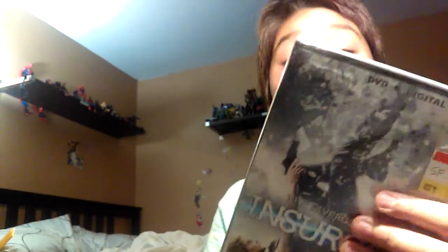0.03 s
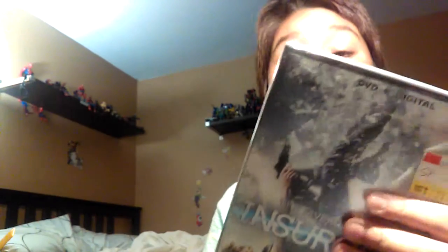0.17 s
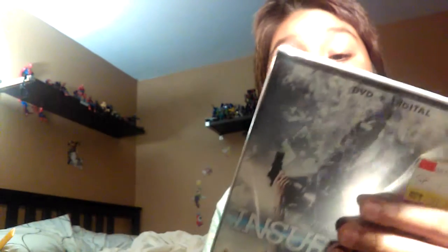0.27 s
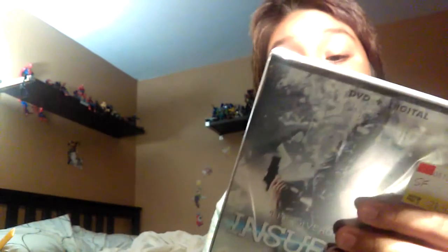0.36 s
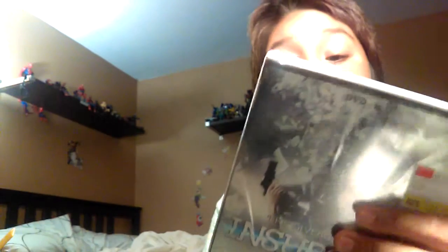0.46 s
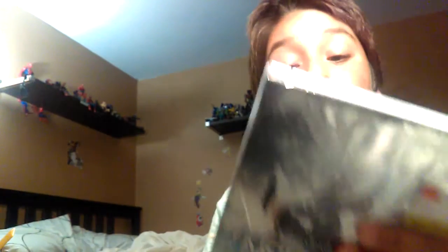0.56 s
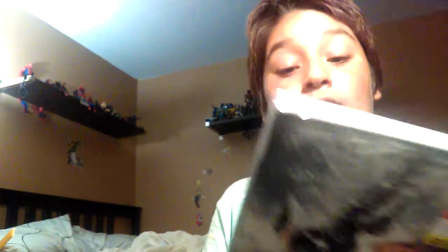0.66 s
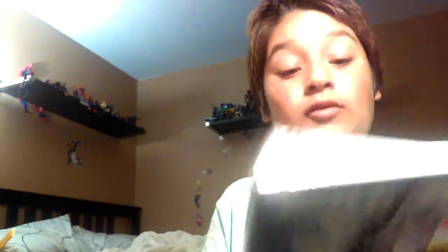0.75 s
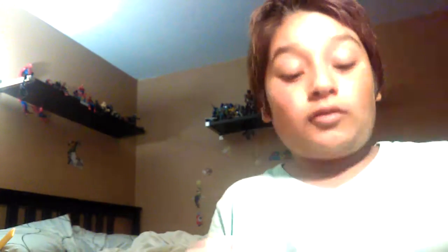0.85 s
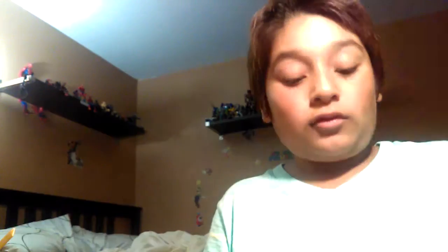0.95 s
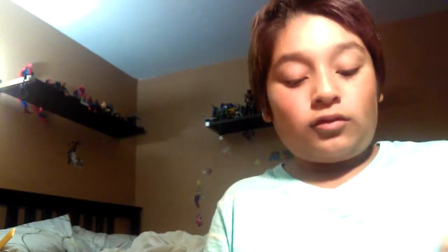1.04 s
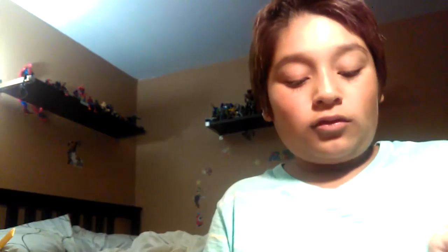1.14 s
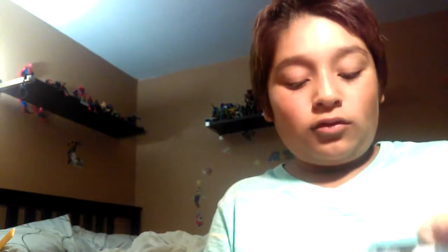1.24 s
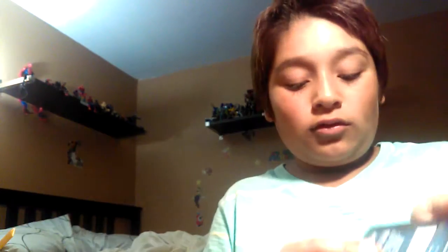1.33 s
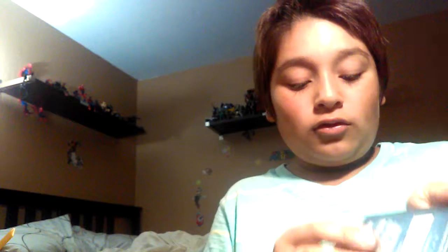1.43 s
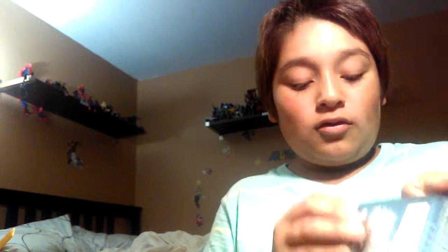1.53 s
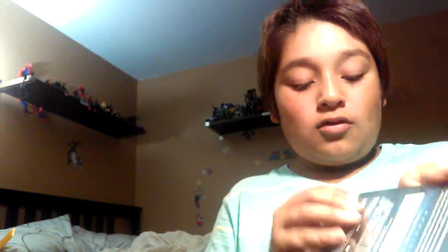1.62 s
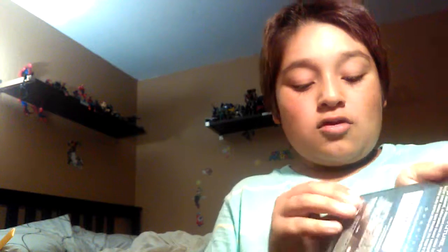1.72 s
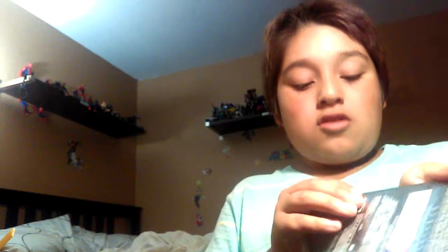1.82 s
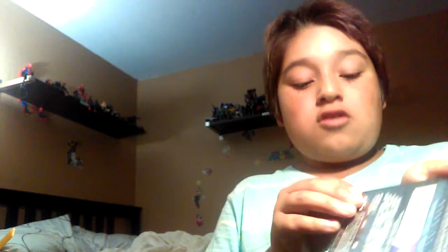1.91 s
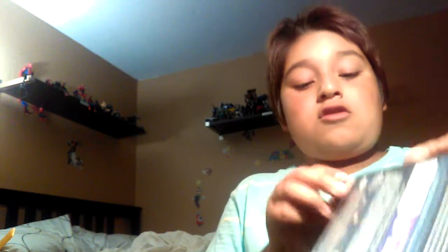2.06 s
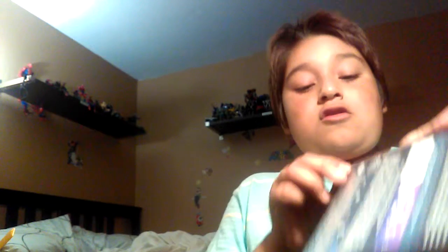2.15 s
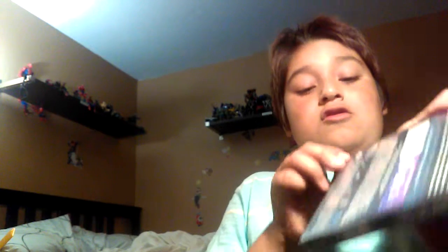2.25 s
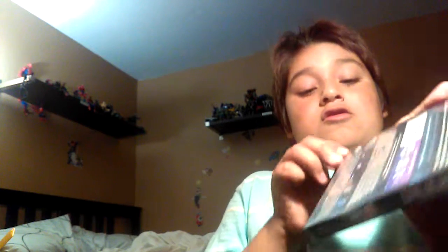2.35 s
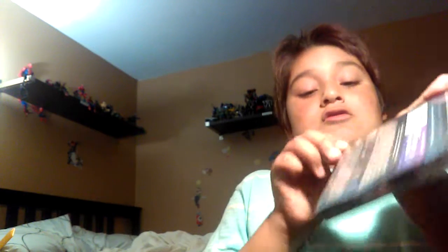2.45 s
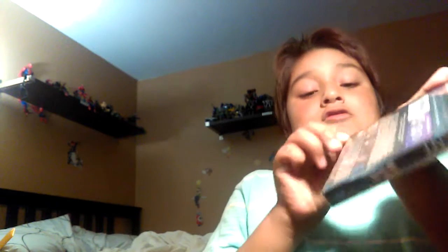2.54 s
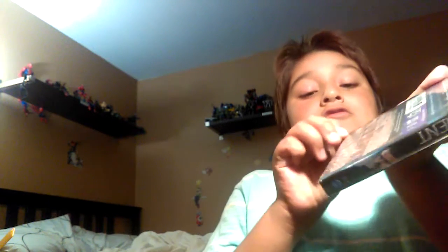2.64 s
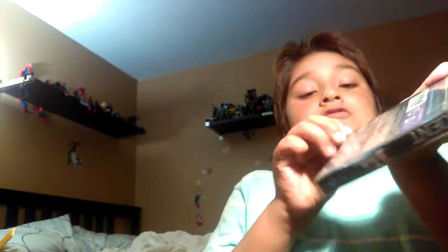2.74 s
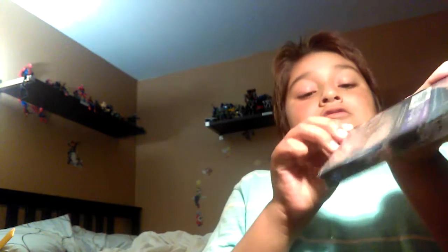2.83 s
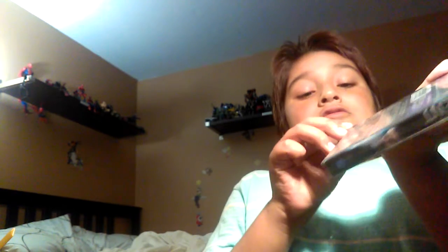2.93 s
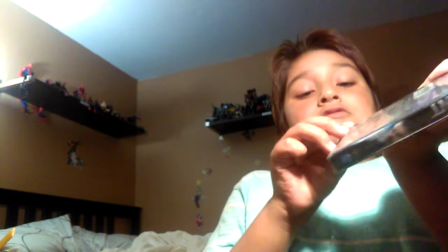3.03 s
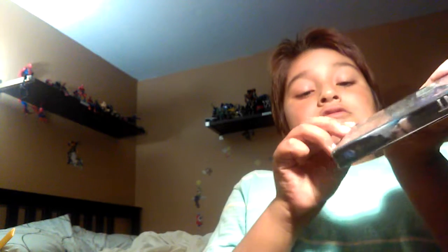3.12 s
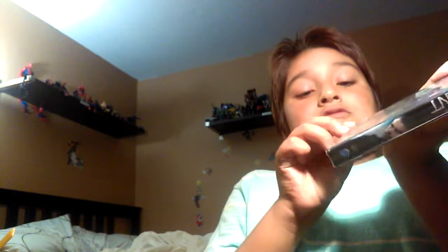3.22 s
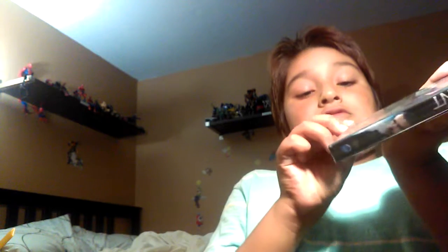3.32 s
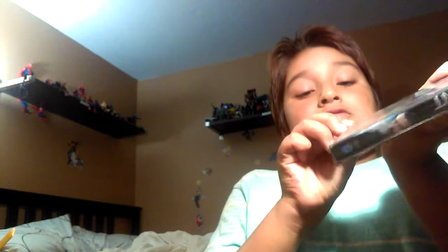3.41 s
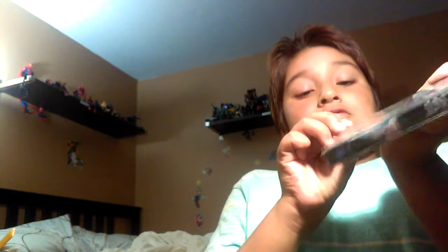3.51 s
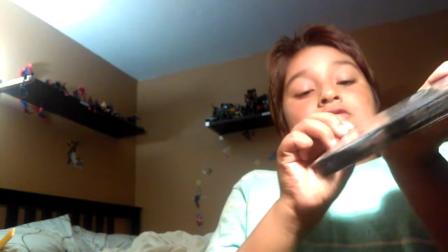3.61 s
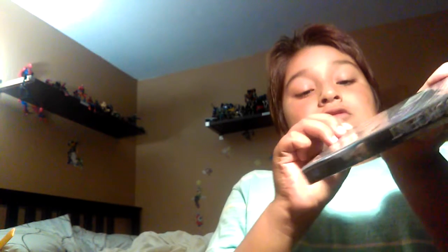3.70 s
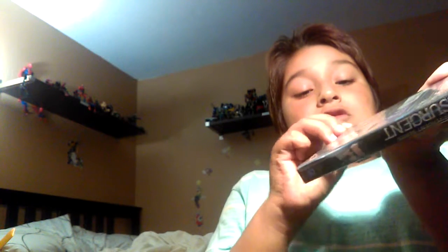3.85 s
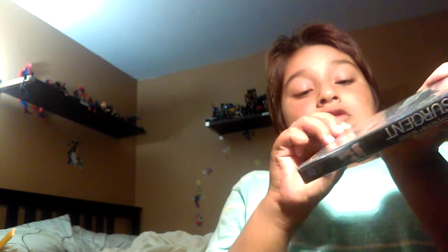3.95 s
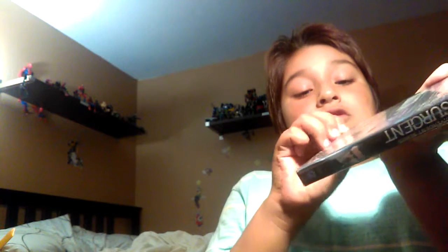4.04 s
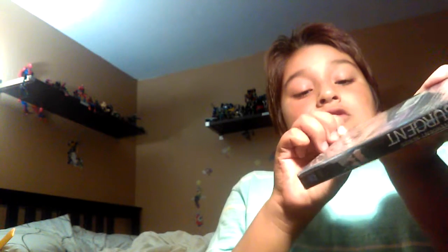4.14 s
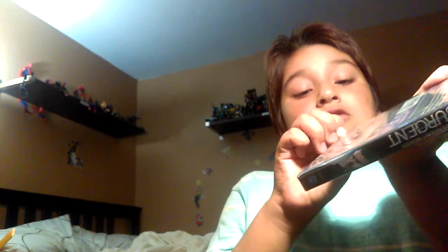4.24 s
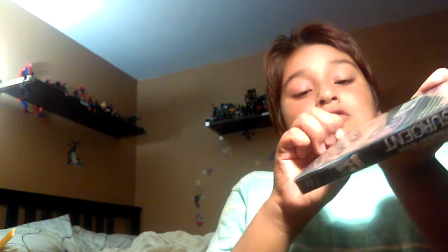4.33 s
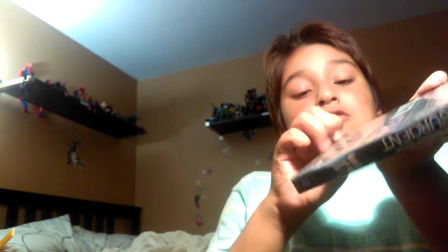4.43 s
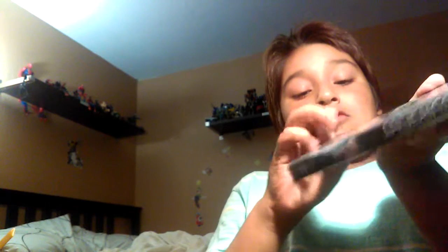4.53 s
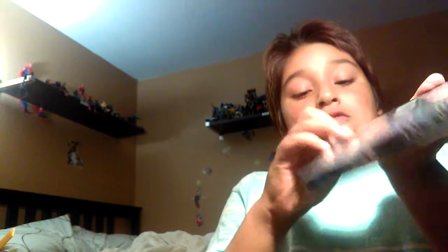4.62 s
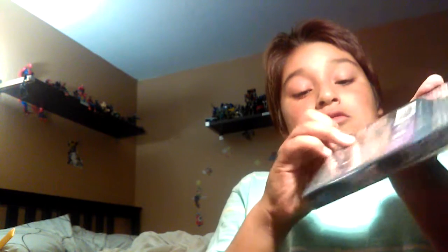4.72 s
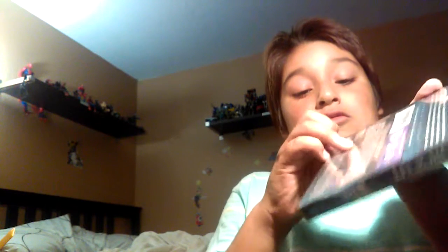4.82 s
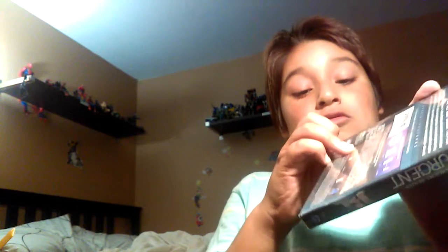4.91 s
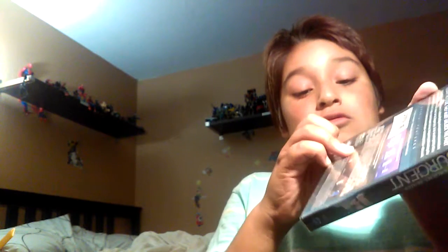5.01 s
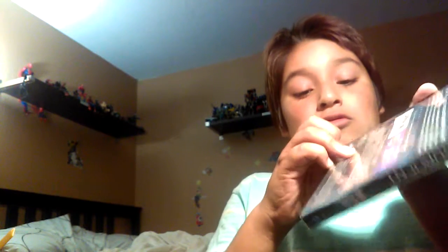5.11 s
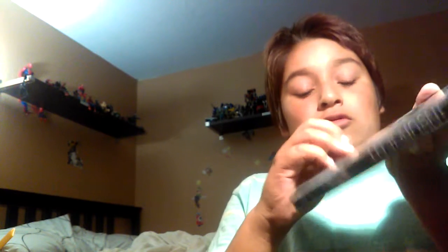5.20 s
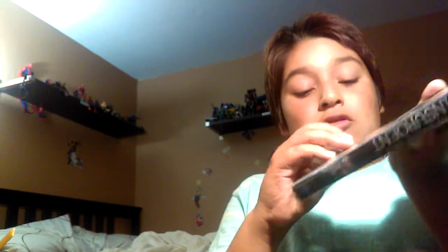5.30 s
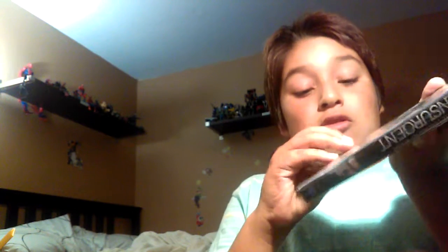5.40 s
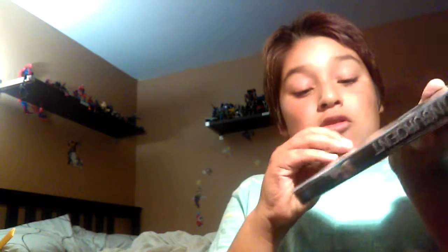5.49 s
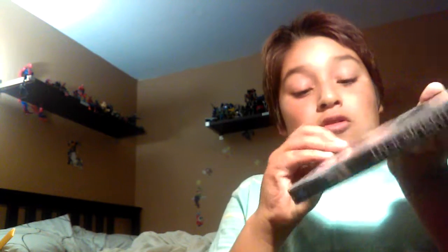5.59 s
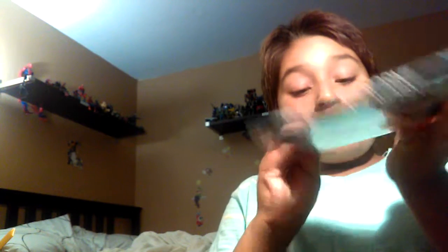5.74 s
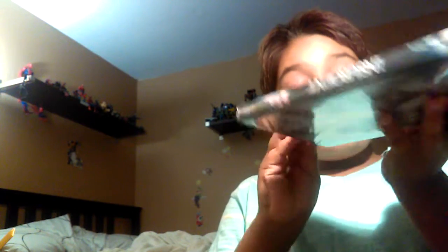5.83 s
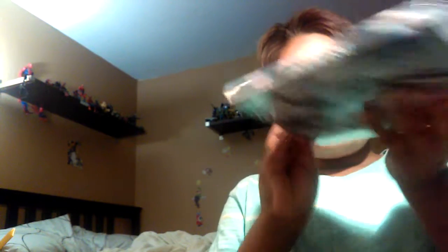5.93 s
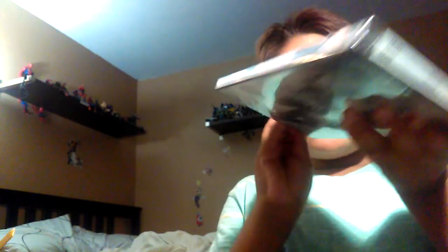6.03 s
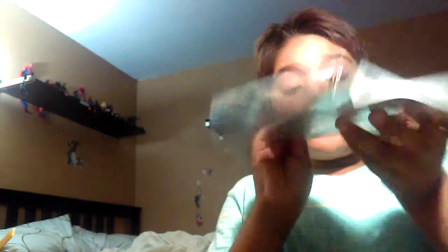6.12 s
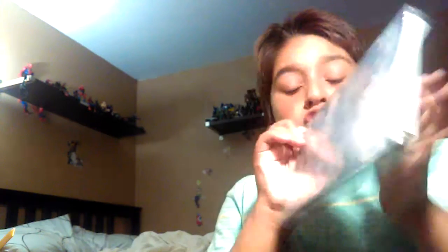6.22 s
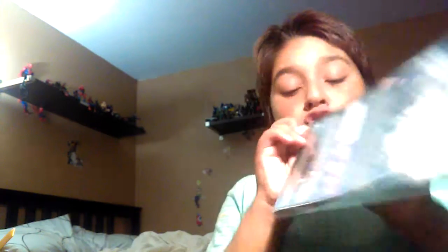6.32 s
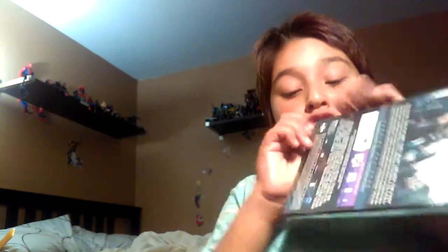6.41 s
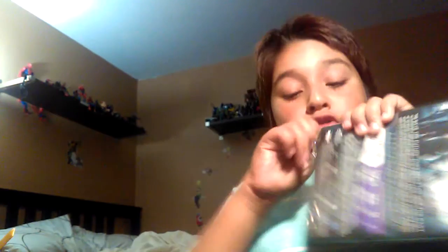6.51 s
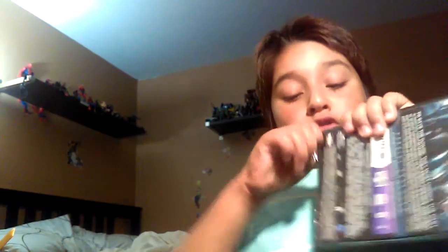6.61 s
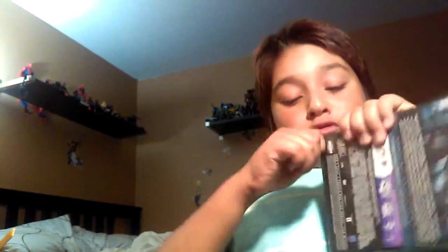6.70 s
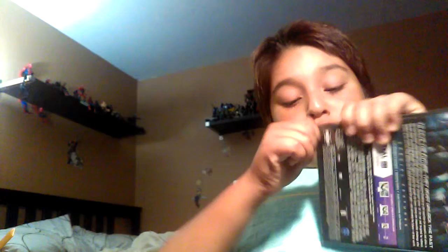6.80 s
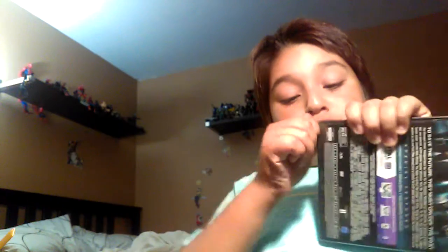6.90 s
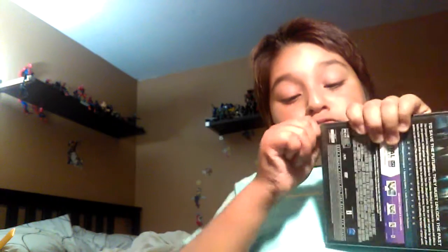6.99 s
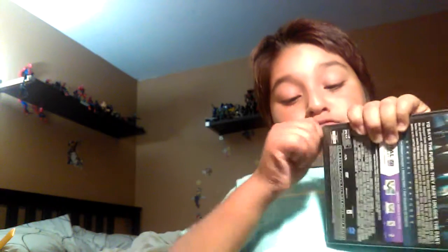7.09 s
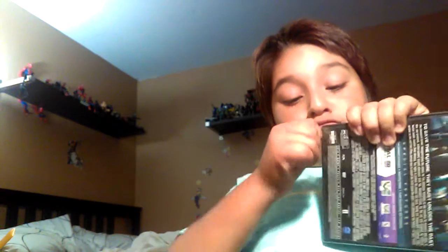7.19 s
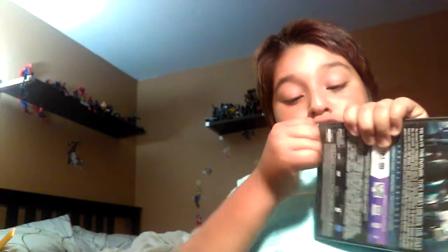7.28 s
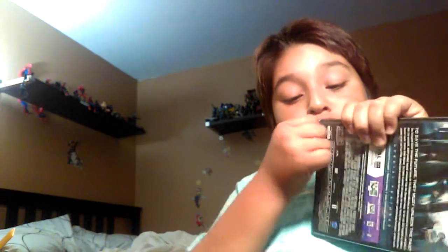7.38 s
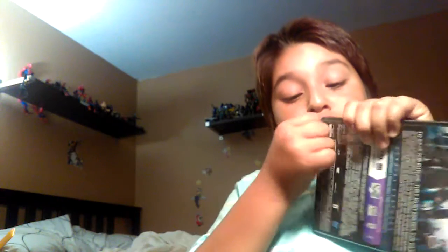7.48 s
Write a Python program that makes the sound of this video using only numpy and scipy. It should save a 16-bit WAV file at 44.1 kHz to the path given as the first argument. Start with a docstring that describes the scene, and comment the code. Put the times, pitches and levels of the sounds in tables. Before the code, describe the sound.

Fingers pick at plastic film on a hollow disc case; sparse crackles and knocks grow into sharp snaps and tearing in a quiet bedroom.

```python
"""A quiet bedroom: fingers pick at the plastic film on a thin disc case, close to a pair of small microphones.
The film snaps, tears and crackles in the treble, made of short noise bursts and bands of gated noise.
Knocks, creaks, plucks and rubbing ring the hollow case, a bank of decaying modes; once it slides over cloth
while the film hisses. The room adds a short noise tail, over a low rumble of handling and background noise."""
import sys
import numpy as np
from scipy import signal
from scipy.fft import rfft, irfft, next_fast_len
from scipy.io import wavfile

SR = 44100
rng = np.random.default_rng(int(sys.argv[2]) if len(sys.argv) > 2 else 0)


def to_wav(sig):
    """Store sig (one row per channel, or 1-D mono) as 16-bit WAV at the path in sys.argv[1].

    Samples outside -1..1 are clipped; the rate is SR.
    """
    pcm = np.clip(np.atleast_2d(sig), -1, 1) * 32767
    pcm = np.round(pcm).astype(np.int16)
    wavfile.write(sys.argv[1], SR, pcm.T)  # frames by channels


N = 332955


def undb(db):
    """Turn dB into gain."""
    return 10 ** (np.asarray(db) / 20)


def unit(x):
    """Scale a sound to an RMS of 1."""
    return x / np.sqrt(np.mean(x ** 2))


def colour(x, points):
    """Shape a spectrum by (frequency [Hz], gain [dB]) points, joined along log frequency."""
    hz, db = np.transpose(points)
    size = next_fast_len(x.shape[-1])
    f = np.maximum(np.arange(size // 2 + 1) * SR / size, 1)
    gain = undb(np.interp(np.log(f), np.log(hz), db))
    return irfft(rfft(x, size) * gain, size)[..., :x.shape[-1]]


def sides(pan_db):
    """Left and right gains, as a column, from left minus right in dB."""
    return undb(np.array([pan_db, -pan_db]) / 2)[:, None]


def fall(x, t60):
    """Every impulse leaves an exponential tail that drops 60 dB in t60 seconds."""
    return signal.lfilter([1], [1, -np.exp(-np.log(1000) / (t60 * SR))], x)


def mode_pole(hz, t60):
    """Complex pole of a mode that swings at hz and drops 60 dB in t60 seconds."""
    return np.exp(2j * np.pi * hz / SR - np.log(1000) / (t60 * SR))


def clicks(per_s, scatter_db, size=N):
    """Impulses at random times; many small, a few large, at most 14 dB over the smallest."""
    when, strength = rng.random(size), rng.exponential(size=size)
    return (when < per_s / SR) * undb(np.minimum(scatter_db * strength, 14))


def add(out, s, sound):
    """Mix a stereo sound in at s seconds."""
    i = int(s * SR)
    out[:, i:i + sound.shape[1]] += sound[:, :N - i]


def burst(hz, width, t60, tail_db, tail_t60):
    """A crack of noise, partly alike at the two ports, then smaller creases as the film settles."""
    t = np.arange(int(.12 * SR)) / SR
    crease_hits = (rng.random(len(t)) < 220 / SR) * rng.random(len(t))
    creases = fall(crease_hits, t60) + 0.06
    edges = np.clip([hz / width, hz * width], 1000, .32 * SR)
    band = signal.butter(2, edges, "band", fs=SR, output="sos")
    noise = rng.standard_normal((2, len(t))) + 1.7 * rng.standard_normal(len(t))  # own + shared
    noise = unit(signal.sosfilt(band, noise)) / np.sqrt(2)
    attack = np.minimum(t / 0.00017, 1)
    crack = attack * 1000 ** (-t / t60) * noise
    # the face of the case returns the crack a moment later
    crack = crack + .45 * np.roll(crack, int(rng.uniform(.0003, .0005) * SR), axis=1)
    return crack + undb(tail_db) * creases * 1000 ** (-t / tail_t60) * noise


def run(start, end, spacing, jitter):
    """Times of a stick-slip row of at most 24 slips, and two chance values for each."""
    chance = rng.standard_normal((24, 3))
    s = start + spacing * (np.arange(24) + jitter * chance[:, 0])
    return s[s < end], chance[s < end, 1:].T


# single snaps of the film: (time [s], level [dB], centre [Hz])
FILM_SNAPS = [(0.341, -38, 8500), (0.469, -38, 10400), (0.5284, -30, 8900), (0.5509, -32, 9400),
              (0.6642, -36, 9200), (0.719, -28.5, 7860), (1.48, -45, 9920), (1.586, -37, 11700),
              (1.9378, -36.5, 7800), (2.4778, -32.5, 11200), (2.6436, -31, 11400), (3.1631, -35.5, 9100),
              (3.3015, -32.5, 10000), (3.474, -37, 11200), (3.497, -28.5, 12000), (3.5784, -30.5, 10800),
              (3.776, -32.5, 11400), (3.8925, -40.5, 7100), (4.027, -49.5, 11500), (4.147, -35.5, 11200),
              (4.289, -43.5, 10630), (4.315, -52, 9500), (4.33, -44, 10000), (4.3595, -39, 11000),
              (4.408, -37.5, 11700), (4.4784, -28.5, 11700), (4.559, -31.5, 9800), (4.578, -37, 10500),
              (4.6365, -35.5, 11100), (4.663, -24.5, 12000), (4.6682, -17, 10300), (4.714, -28.5, 10700),
              (4.716, -25, 11000), (4.832, -27, 11300), (4.846, -24.5, 12200), (4.896, -31, 11100),
              (5.067, -37, 12900), (5.2037, -31, 11600), (5.2455, -35, 11800), (5.3475, -41, 8600),
              (5.4483, -39, 12400), (5.63, -26.5, 9340), (5.655, -35, 8600), (5.749, -29.5, 12000),
              (5.837, -33, 12600), (5.89, -19, 8800), (5.96, -20.5, 8700), (6.0783, -38, 9500),
              (6.147, -37, 9500), (6.1578, -30, 10600), (6.174, -28, 9900), (6.195, -25, 11600),
              (6.1985, -33, 11600), (6.2074, -18.5, 10700), (6.226, -21, 11900), (6.2323, -21.5, 13600),
              (6.247, -31, 8250), (6.2637, -22, 8500), (6.28, -23.5, 12000), (6.505, -40, 11100),
              (6.542, -26.5, 9300), (6.7839, -28.5, 10500), (7.039, -31.5, 10000), (7.256, -39, 10200)]
# the film gives way in a row of snaps: (start [s], end [s], spacing [s], level [dB], centre [Hz])
FILM_TEARS = [(4.908, 5.041, 0.011, -47, 12000), (6.675, 6.78, 0.031, -38, 9400)]
TEAR_JITTER = .3  # share of the spacing


def snaps():
    """All snaps (s, dB, Hz): single ones, and tears as uneven rows scattered in level and pitch."""
    rows = [np.array(FILM_SNAPS)]
    for start, end, spacing, db, hz in FILM_TEARS:
        s, chance = run(start, end, spacing, TEAR_JITTER)
        rows.append(np.transpose([s, db + 2.3 * chance[0], hz * np.exp(0.041 * chance[1])]))
    return np.vstack(rows)


# the film is crumpled in short spells: (start [s], hold [s], crackle level [dB])
CRUMPLE_SPELLS = [(1.022, 0.0097, -76), (1.568, 0.18, -63.5), (4.492, 0.017, -60), (4.687, 0.043, -64),
                  (5.204, 0.0051, -48), (6.197, 0.073, -45), (6.47, 0.09, -45), (6.644, 0.069, -49.5)]
CRUMPLE_RISE_DB_S, CRUMPLE_FALL_DB_S = 510.5, 251


def crumpling(t):
    """Crackle gain of the crumpled spells: quick rise, hold, slower fall."""
    gain = np.zeros(len(t))
    for s, hold, db in CRUMPLE_SPELLS:
        rise = CRUMPLE_RISE_DB_S * np.maximum(s - t, 0)
        drop = CRUMPLE_FALL_DB_S * np.maximum(t - s - hold, 0)
        gain += undb(db - rise - drop)
    return gain


# tone of the film's crackle: (frequency [Hz], relative level per Hz [dB])
CRACKLE_TONE = [(1180, -48), (2370, -14.5), (3550, 4), (4790, 1.5), (7520, 11.5), (12400, 12.5),
                (14500, -4), (16500, -19.5)]
# stereo place of the crackle: (frequency [Hz], left minus right [dB])
CRACKLE_PAN = [(4400, -16.5), (8100, -6), (15000, 10)]
SNAP_T60_S = .008
SNAP_PAN_DB_PER_OCTAVE, SNAP_CENTRE_HZ = 6, 9700  # brighter snaps lie further left


def film(crackle, creases, snap):
    """Snaps as noise bursts, and under them fine crackle whose creases each have their own colour."""
    out = np.zeros((2, N))
    for s, db, hz in snap:
        pan_db = SNAP_PAN_DB_PER_OCTAVE * np.log2(hz / SNAP_CENTRE_HZ)
        add(out, s, undb(db) * sides(pan_db) * burst(hz, 1.366, SNAP_T60_S, -10.5, 0.16))
    hz, db = np.transpose(CRACKLE_TONE)
    pan_hz, pan_points_db = np.transpose(CRACKLE_PAN)
    bands = []
    for centre in np.geomspace(2500, 14000, num=5):
        window = np.transpose([hz, db - 30 * np.log(hz / centre) ** 2])
        # each crease is strong in some bands and weak in others
        gate = fall(creases * undb(3.4 * rng.standard_normal(N)), 0.007) + .07
        pan_db = np.interp(np.log(centre), np.log(pan_hz), pan_points_db)
        bands.append(gate * colour(rng.standard_normal((2, N)), window) * sides(pan_db))
    return out + crackle * unit(np.array(bands)).sum(axis=0) / np.sqrt(len(bands))


# the lid creaks under the grip: (time [s], level [dB])
LID_CREAKS = [(0.342, -41.5), (0.353, -42), (0.385, -42), (0.403, -33), (0.426, -35.5), (0.456, -48),
              (0.471, -34), (0.494, -35.5), (0.53, -44), (0.557, -33.5), (0.637, -32), (0.692, -30),
              (0.767, -31.5), (0.96, -37.5), (0.981, -36), (1.593, -37.5), (1.704, -39), (2.262, -38.5),
              (2.358, -44), (2.479, -39.5), (2.554, -42), (3.276, -40.5), (3.57, -35.5), (4.482, -53),
              (4.493, -37), (4.831, -47), (4.876, -40.5), (3.687, -35.5), (5.449, -43), (5.654, -38.5),
              (5.872, -22.5), (6.168, -39), (6.209, -31.5), (6.264, -31), (6.351, -29.5), (6.449, -40),
              (6.461, -17.5), (6.484, -29), (6.488, -23.5), (6.528, -31), (6.571, -20), (6.629, -25.5),
              (6.89, -40), (7.062, -37), (7.476, -31), (7.516, -40)]
# runs of quick creaks: (start [s], end [s], spacing [s], level [dB])
QUICK_CREAKS = [(3.351, 3.47, 0.015, -43), (5.695, 5.801, 0.0075, -45)]
# a nail plucks the taut edge of the film: (time [s], level [dB])
NAIL_PLUCKS = [(4.6254, -44.5), (4.7137, -35.5), (5.2036, -32), (5.2465, -34), (5.3467, -40.5),
               (5.6291, -34), (6.1459, -33), (6.1814, -41), (6.2253, -29.5), (6.2472, -27), (6.2791, -25),
               (6.5425, -17.5), (6.6712, -35), (6.7082, -38), (6.7276, -36), (6.7324, -32), (6.7595, -35),
               (6.7845, -29)]
CREAK_HZ, PLUCK_HZ, TICK_SPREAD = 1230, 2820, .08  # centres; each tick lies a little off (log spread)
CREAK_JITTER, CREAK_SCATTER_DB = 0.08, 2  # in runs; jitter is a share of the spacing


def ticks():
    """All creaks and plucks (s, dB, Hz): short pushes, each with its own centre in the case's modes."""
    rows = [np.insert(LID_CREAKS, 2, CREAK_HZ, axis=1), np.insert(NAIL_PLUCKS, 2, PLUCK_HZ, axis=1)]
    for start, end, spacing, db in QUICK_CREAKS:
        s, chance = run(start, end, spacing, CREAK_JITTER)
        rows.append(np.transpose([s, db + CREAK_SCATTER_DB * chance[0], np.full(len(s), CREAK_HZ)]))
    s, db, hz = np.vstack(rows).T
    return np.transpose([s, db, hz * np.exp(TICK_SPREAD * rng.standard_normal(len(s)))])


# fingers moving over case and film: (time [s], rubbing level [dB], crackle level [dB])
FINGER_MOVES = [(0, -56, -56.5), (.3, -64, -70.5), (.65, -51, -59), (.95, -64.5, -59), (1.2, -44.5, -63),
                (1.5, -54.5, -63.5), (1.781, -63.5, -73.5), (2.269, -66, -78), (2.651, -61.5, -68.5),
                (3.049, -72, -74), (3.45, -64, -64.5), (4.149, -72, -75.5), (4.549, -65.5, -75),
                (5.75, -65, -63.5), (6.2, -57, -64.5), (6.42, -54.5, -99), (6.58, -43, -74),
                (6.85, -61.5, -59.5), (7.2, -64.5, -66.5), (7.55, -64.5, -56.5)]


def fingers(t):
    """Rubbing and crackle levels in dB, gliding from point to point as the fingers move."""
    s, rub_db, crackle_db = np.transpose(FINGER_MOVES)
    return np.interp(t, s, rub_db), np.interp(t, s, crackle_db)


# knocks and picks on the case: (time [s], level [dB], upper modes over that [dB],
# low modes over that [dB], odd modes over even [dB])
CASE_KNOCKS = [(0.032, -44, 9, 5.5, -5.5), (0.255, -43, 3.5, 10, 3), (0.653, -46, 9, 10.5, -6),
               (0.8334, -12.5, 2, 0, 11), (0.857, -47, -16, -6, -5), (1.014, -48.5, 3, 3.5, -22),
               (1.037, -41.5, 4, -15, 13), (1.0435, -37, 5.5, -9, -4), (1.1086, -16.5, -0.5, -4.5, 8),
               (1.2196, -17.5, 6.5, -9.5, -14), (1.849, -44.5, -26, -9, -7),
               (2.601, -34.5, -1.5, -19, -3.5), (3.474, -36, -8.5, -18, -3), (3.608, -45, 2, -10, -1),
               (4.735, -45, -15, -3, -8), (6.307, -34.5, -7, -22, 0)]
# modes of the hollow case: (frequency [Hz], level [dB], t60 [s], left minus right [dB])
CASE_MODES = [(76, -8.5, 0.024, -13), (132, 2, 0.06, -1.5), (212, -4.5, 0.09, -5), (323, -7.5, 0.047, -5.5),
              (413, -0.5, 0.025, 0), (549, -3, 0.028, -3), (728, 1, 0.013, -4), (947, -6, 0.024, 0),
              (1212, -2, 0.01, -7), (1368, -8, 0.021, -11), (1576, -12.5, 0.019, -10.5),
              (2532, -9, 0.016, -5.5), (2249, -10, 0.015, -8.5), (2760, -5.5, 0.0048, -10)]
PORT_LAG_S = 0.000092  # the ring reaches the right port later
SNAP_RING_DB = -13  # push of a snap on the case, over the snap's level
CRACK_DB = -4.5  # crack of a knock, over its upper modes


def case(rub_db, creases, snap, creak):
    """Knocks, snaps, creaks, plucks and slipping fingers ring one set of modes; each touch weighs them anew."""
    out = np.zeros((2, N))
    slips = clicks(per_s=260., scatter_db=3.) + 0.02 * rng.standard_normal(N)
    slips = unit(slips) * undb(rub_db)
    knock_at, snap_at, creak_at = ((np.array(table)[:, 0] * SR).astype(int)
                                   for table in (CASE_KNOCKS, snap, creak))
    mid_db, up_db, low_db, odd_db = np.array(CASE_KNOCKS)[:, 1:].T
    for k, (hz, db, t60, pan_db) in enumerate(CASE_MODES):
        push = np.zeros(N)
        up = np.clip(np.log(hz / 600) / np.log(1600 / 600), 0, 1)
        low = np.clip(np.log(600 / hz) / np.log(600 / 170), 0, 1)
        # the spot that is struck favours every other mode
        spot_db = -(-1) ** k * (1 - low) * odd_db / 2
        # pairs of modes start in opposite directions
        push[knock_at] = (-1) ** (k // 2) * undb(mid_db + up * up_db + low * low_db + spot_db)
        # a creak or pluck moves only the modes near its centre
        push[creak_at] += (-1) ** k * undb(creak[:, 1] - 60 * np.log(hz / creak[:, 2]) ** 2)
        # a snap is too quick to move the low modes
        chance = rng.uniform(-1.28, 1, len(snap))
        push[snap_at] += undb(snap[:, 1] + SNAP_RING_DB) * min(hz / 1300, 1) ** 2 * chance
        rubbed = undb(-37.5) * slips * min(hz / 500, 1, 1600 / hz) / np.sqrt(t60)
        # the crackling film shakes the upper modes
        shaken = undb(-16.5) * creases * min(hz / 2300, 1) ** 2
        push += (rubbed + shaken) * rng.standard_normal(N)
        # a fingertip stays in contact for a moment, so the ring builds up
        contact = fall(push, 0.001) * np.sqrt(1 + (hz / 600) ** 2) / 13
        ring = signal.lfilter([1], [1, -mode_pole(hz, t60)], contact)
        lag = np.exp(-2j * np.pi * hz * PORT_LAG_S * np.array([[0], [1]]))
        out += undb(db) * sides(pan_db) * (lag * ring).imag
    for s, knock_db, upper_db, *_ in CASE_KNOCKS:
        crack = burst(6000.0, 1.8, 0.008, -20, 0.04)
        add(out, s, undb(knock_db + upper_db + CRACK_DB) * sides(-8.5) * crack)
    return out


# the case slides over cloth: (time [s], level [dB], centre [Hz])
CLOTH_SLIDE = [(1.115, -76, 1000), (1.155, -50.5, 1040), (1.2, -60, 1010), (1.24, -59, 1140),
               (1.3, -57.5, 950), (1.378, -44.5, 880), (1.45, -58, 796), (1.5, -51.5, 490),
               (1.555, -55, 434), (1.579, -88, 420)]
SLIDE_RING_CYCLES = 30  # each mode drops 60 dB in this many cycles


def slide():
    """Uneven scraping rings the modes near a centre that sinks as the case settles; upper modes rustle along."""
    s, db, centre_hz = np.transpose(CLOTH_SLIDE)
    t = np.arange(int(s[0] * SR), int((s[-1] + 0.09) * SR)) / SR
    centre, level = np.interp(t, s, centre_hz), undb(np.interp(t, s, db, right=-120))
    scrape = np.zeros(len(t))
    for hz, *_ in CASE_MODES[3:]:
        grit = fall(clicks(per_s=270.0, scatter_db=4.0, size=len(t)), 0.061) + 0.26
        nearness = np.maximum(undb(-35 * np.log(hz / centre) ** 2), undb(-21.0))
        push = unit(grit) * level * nearness * rng.standard_normal(len(t))
        pole = mode_pole(hz, SLIDE_RING_CYCLES / hz)
        ring = signal.lfilter([1], [1, -pole], push).imag
        scrape += np.sqrt(1 - abs(pole) ** 2) * ring  # evens out narrow and wide modes
    out = np.zeros((2, N))
    add(out, s[0], sides(-11.5) * 1.25 * scrape)
    return out


SWISH_START_S, SWISH_HOLD_S = 1.23, 0.17
SWISH_DB, SWISH_SAG_DB_S = -52, 18.5  # level at the start, and its sag during the hold


def swish(t):
    """Smooth noise of the film hissing over the cloth; it sags, then dies like a crumple."""
    since = t - SWISH_START_S
    sag = SWISH_SAG_DB_S * np.clip(since, 0, SWISH_HOLD_S)
    drop = CRUMPLE_FALL_DB_S * np.maximum(since - SWISH_HOLD_S, 0)
    tone = [(1500, -16.5), (2500, 3.5), (5000, -7), (9000, 3.5), (15000, -12.5)]
    hiss = colour(rng.standard_normal((2, N)), tone)
    return unit(hiss) * undb(SWISH_DB - sag - drop) * (since > 0)


ROOM_T60_S, ROOM_DB = 0.16, -11.5


def room(x):
    """Short diffuse tail, starting after the first wall; soft furnishings take the treble."""
    t = np.arange(int(.4 * SR)) / SR
    tail = colour(rng.standard_normal((2, len(t))), [(300, 1.0), (3000, -7.5), (12000, -4.5)])
    tail = tail * 1000 ** (-t / ROOM_T60_S) * (t > .004)
    tail = tail / np.sqrt(np.sum(tail ** 2, axis=1, keepdims=True))
    return undb(ROOM_DB) * signal.fftconvolve(x, tail, axes=1)[:, :N]


RUMBLE_DB = -52.5  # at a rubbing level of 0 dB
RUMBLE_GROWTH = 0.2  # dB for each dB of rubbing


def handling(rub_db):
    """Low rumble of arms and bedding: dark noise that grows with the rubbing, alike at both ports."""
    rumble = colour(rng.standard_normal(N), [(30, 3.5), (70, 9.5), (130, 6), (250, -9.0), (2000, -59.5)])
    return unit(rumble) * undb(RUMBLE_DB + RUMBLE_GROWTH * rub_db)


# tone of the background noise: (frequency [Hz], relative level per Hz [dB])
QUIET_TONE = [(18, -54.5), (30, -22), (65, -5.5), (109, -25.5), (135, -14), (283, -18), (533, -28.5),
              (7470, -33.5), (16500, -36)]
QUIET_DB = -65.5


def quiet():
    """Background noise with hiss and low rumble, mostly unrelated left and right, partly shared around 400 Hz."""
    own = colour(rng.standard_normal((2, N)), QUIET_TONE)
    shared = colour(rng.standard_normal(N), QUIET_TONE)
    shared = colour(shared, [(100, -29.0), (400, -2.5), (1000, -18.0)])
    return unit(own + shared) * undb(QUIET_DB)


def scene():
    """Film, case, slide and swish share the room; handling rumble and background noise are added dry."""
    t = np.arange(N) / SR
    rub_db, crackle_db = fingers(t)
    crackle, snap = undb(crackle_db) + crumpling(t), snaps()
    creases = clicks(per_s=240.0, scatter_db=4.0)
    near = case(rub_db, unit(creases) * crackle, snap, ticks())
    near = near + film(crackle, creases, snap) + slide() + swish(t)
    return near + room(near) + handling(rub_db) + quiet()


TOP_HZ = 15900


def record(dry):
    """The recorder cuts the lowest bass gently and the top steeply."""
    dry = signal.sosfilt(signal.butter(2, 40, "high", fs=SR, output="sos"), dry)
    return signal.sosfilt(signal.ellip(10, .2, 90, TOP_HZ, fs=SR, output="sos"), dry)


dry = scene()
out = record(dry)
to_wav(out)
```